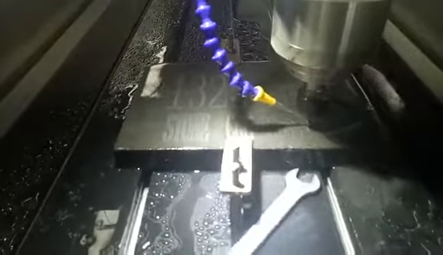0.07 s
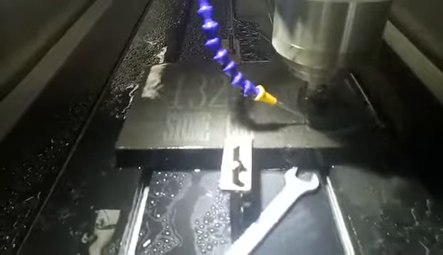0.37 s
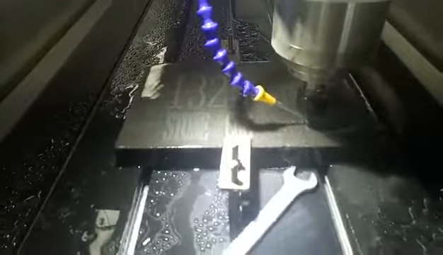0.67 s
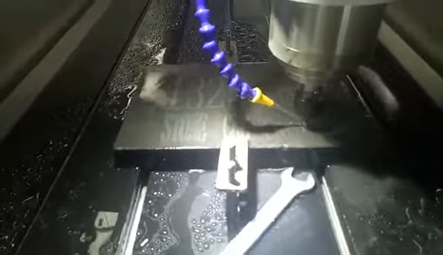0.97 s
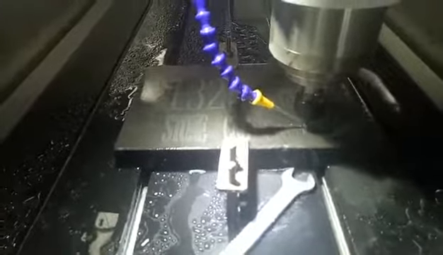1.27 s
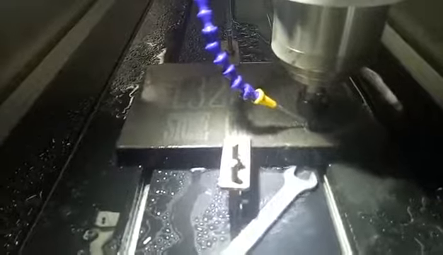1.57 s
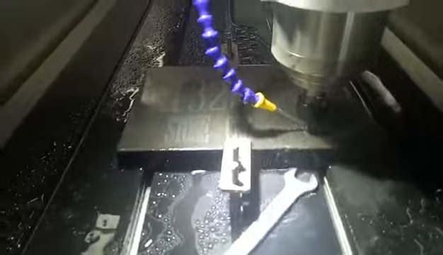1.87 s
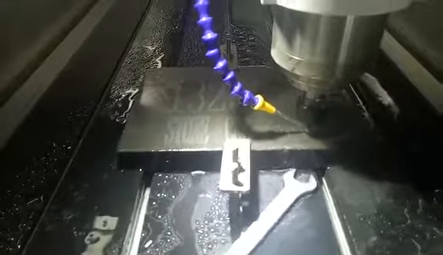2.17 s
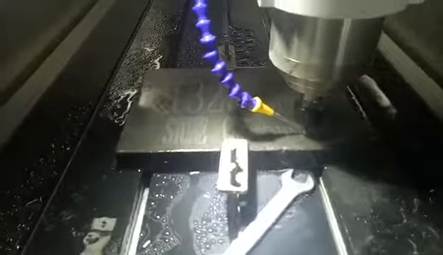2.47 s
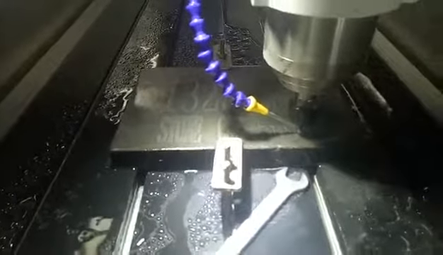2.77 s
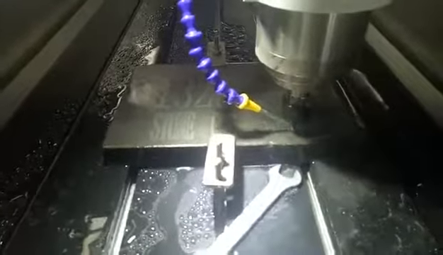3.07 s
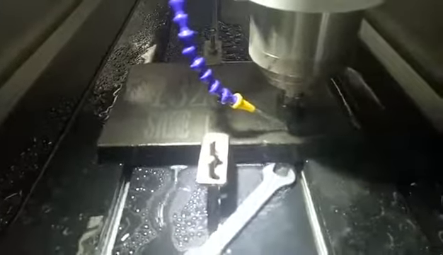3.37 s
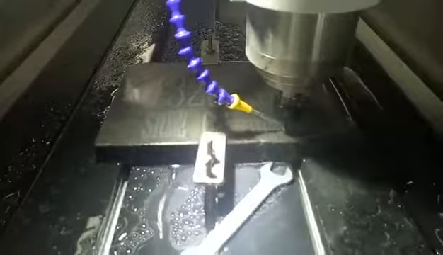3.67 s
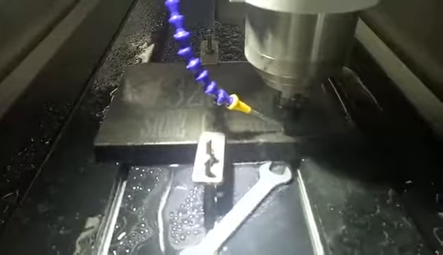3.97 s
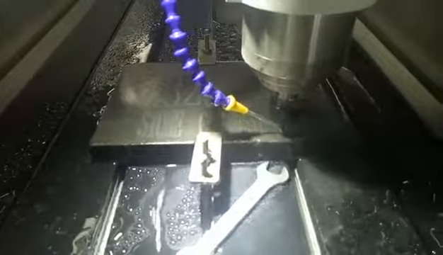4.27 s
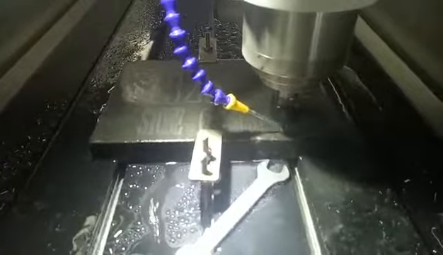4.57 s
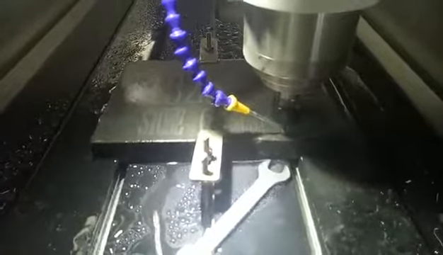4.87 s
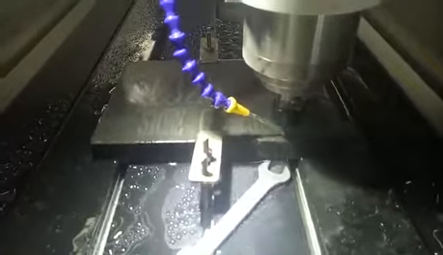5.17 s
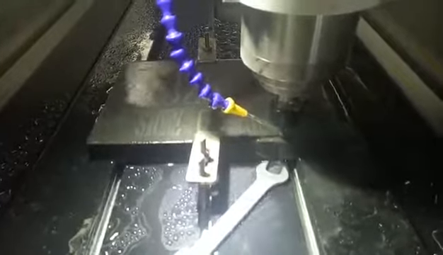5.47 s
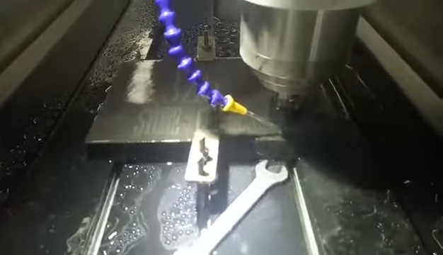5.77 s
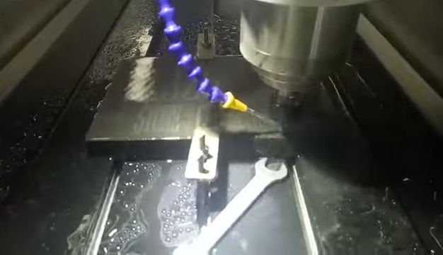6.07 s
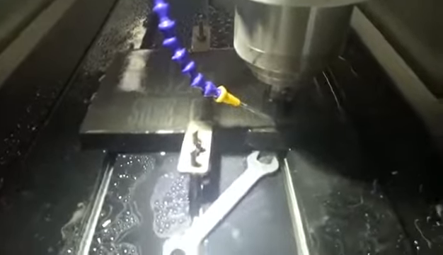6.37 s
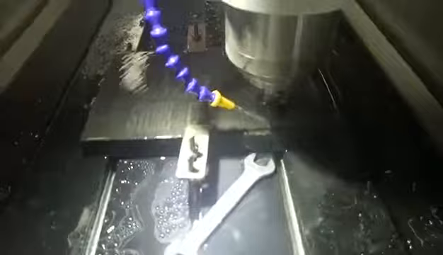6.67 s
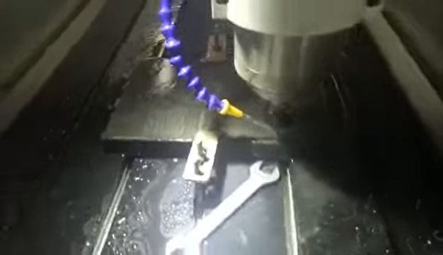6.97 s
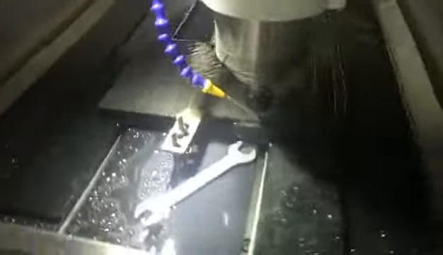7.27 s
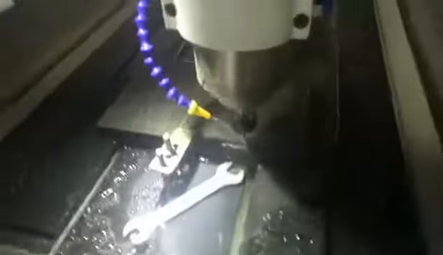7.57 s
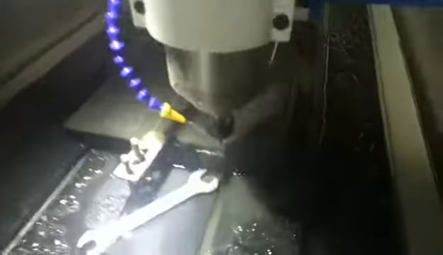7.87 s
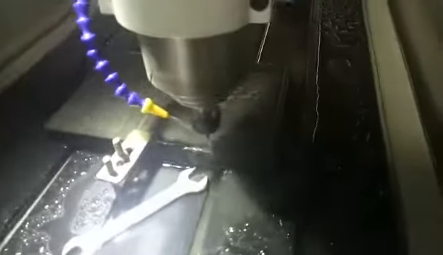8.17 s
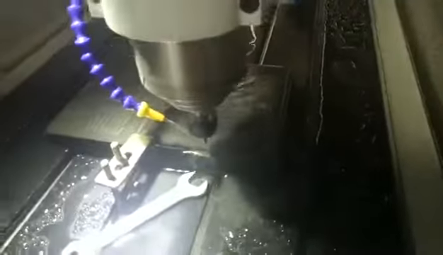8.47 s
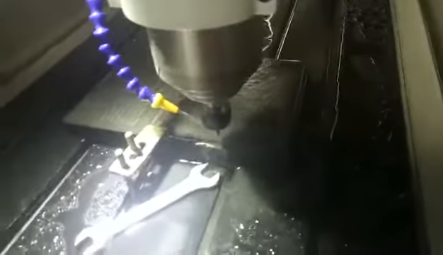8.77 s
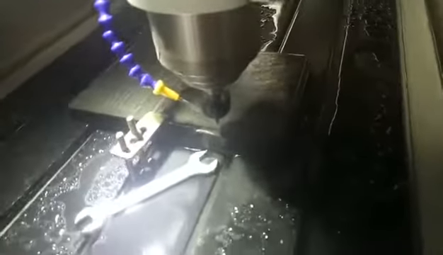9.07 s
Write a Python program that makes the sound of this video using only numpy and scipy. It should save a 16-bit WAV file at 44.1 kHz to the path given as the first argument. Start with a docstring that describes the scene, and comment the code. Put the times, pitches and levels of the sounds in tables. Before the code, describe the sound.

A fast milling bit engraves a wet stone slab inside a machine enclosure, making a loud, harsh, wavering whine with gritty grinding. A little past halfway the cutting stops abruptly as the bit lifts. The spindle keeps humming with thin, high whistles, while the moving table rumbles and its motors whine faintly. A coolant jet hisses throughout. The sound is close and leans to the left.

```python
"""A router bit at 24000 rpm engraves a wet stone slab inside a machine enclosure.
One impact a turn makes a harmonic series, a harsh, wavering whine, and crushes grit in noisy bursts.
After 5.5 s the bit lifts clear; the spindle's imbalance hums on and its motor drive whistles.
The coolant jet hisses throughout, and the axis drives rumble and whine faintly as the table travels."""
import sys
import numpy as np
from scipy import signal
from scipy.fft import rfft, irfft, next_fast_len
from scipy.io import wavfile
from scipy.ndimage import uniform_filter1d, map_coordinates

SR = 44100
rng = np.random.default_rng(int(sys.argv[2]) if len(sys.argv) > 2 else 0)


def store_pcm(level_fs):
    """Save levels as 16-bit WAV."""
    pcm = np.round(np.clip(level_fs, -1, 1) * 32767).astype(np.int16)
    wavfile.write(sys.argv[1], SR, np.atleast_2d(pcm).T)


N = 401751

SPINDLE_HZ = 400.3
# share of the bit's contact with the stone: time_s, contact_fraction
STONE_CONTACT = [(5.475, 1), (5.525, 0)]
# force on the bit as it enters the stone, settles to full depth and lifts: time_s, force_db
CUTTING_FORCE = [(0, -8.5), (.14, -9.5), (.22, -4), (.39, -3), (.55, -8), (.66, -1), (1.0, 1.5), (2.2, 0.5),
                 (3.0, 1), (3.6, -1), (4.25, 0), (4.8, -1), (5.44, 0.5), (5.52, -7.5)]
# the listener swings towards the spindle and away: time_s, gain_db
LISTENER_APPROACH = [(7, -1), (7.7, 3.5), (8.4, -0.5)]
# level difference between the ears: frequency_hz, left_minus_right_db
EAR_BALANCE = [(60, 6.5), (200, 5), (700, 6.5), (1280, 7), (2350, 11.5), (4330, 8.5), (6300, 8),
               (8000, 13.5), (11500, 1.5), (13500, -7)]


def whine(angle):
    """Periodic impacts make harmonics; uneven stone modulates the force and instant of each blow."""
    # side load on the bit, heard in the second order: time_s, level_db
    side_load = [(0.0, -30), (0.18, -30), (0.21, -24.5), (1.0, -25), (1.43, -29), (2.34, -26.5),
                 (5.34, -27), (5.45, -26)]
    # spectral envelope of orders 4, 5 and 8: frequency_hz, gain_db
    ring_spectrum = [(1600, -8.5), (2000, -9), (3200, -4.5)]
    # spectral envelope of orders 9 to 24: frequency_hz, gain_db
    screech_spectrum = [(3600, -5), (4000, -7.5), (4400, -7.5), (4800, -12.5), (5200, -15.5), (6400, -23.5),
                        (7600, -33.5), (8400, -43), (11000, -38.5), (15000, -51)]
    load_db, force_db = curves(side_load)[0], curves(CUTTING_FORCE)[0]
    strike = angle + 0.028 * wobble(25) + 0.0051 * wobble(140)
    load_gain = amp(load_db + 0.53 * wobble(12))
    out = load_gain * overtone(strike, order=2, rough=0.21, width_hz=17, lean_db=2, apart=0.38)
    bite_db = -28.5 + force_db + flare(3 * SPINDLE_HZ) + 0.92 * wobble(9)
    out += amp(bite_db) * overtone(strike, order=3, rough=0.32, width_hz=5.9, lean_db=9, apart=0.94)
    # the sixth and seventh orders lie on resonances of the tool
    low_db = -28.5 + force_db + chatter(6 * SPINDLE_HZ, collapse_db=11.5)
    high_db = -31 + force_db / 2 + chatter(7 * SPINDLE_HZ, collapse_db=9.5)
    out += amp(low_db) * overtone(strike, order=6, rough=0.14, width_hz=12, lean_db=9, apart=1.17)
    out += amp(high_db) * overtone(strike, order=7, rough=0.19, width_hz=9, lean_db=13.5, apart=0.65)
    for order in (4, 5, 8):
        hz = order * SPINDLE_HZ
        level_db = -29.5 + force_db + along(ring_spectrum, hz) + flare(hz) + 1.2 * wobble(13)
        tone = overtone(strike, order, rough=0.33, width_hz=7, lean_db=along(EAR_BALANCE, hz), apart=1.57)
        out += amp(level_db) * tone
    # the screech passes from one high order to another
    screech_db = -31 + 0.63 * force_db + 0.61 * wobble(10)
    for order in range(9, 25):
        hz = order * SPINDLE_HZ
        level_db = screech_db + along(screech_spectrum, hz) + flare(hz) + 2 * wobble(14)
        lean_db = along(EAR_BALANCE, hz)
        tone = overtone(strike, order, rough=0.63, width_hz=23, lean_db=lean_db, apart=1.55)
        out += amp(level_db) * tone
    return out * amp(0.5 * wobble(35) + 0.59 * wobble(200))


def overtone(strike, order, rough, width_hz, lean_db, apart):
    """Partial coherence: a steady harmonic plus narrowband noise; apart makes the two ears differ."""
    shared = np.exp(2j * np.pi * rng.random()) + rough * flutter(width_hz)
    per_ear = apart * rough * np.array([flutter(width_hz), flutter(width_hz)])
    left_lag = np.exp([[-1j * apart], [0j]])
    pair = np.real((shared + per_ear) * np.exp(1j * order * strike) * left_lag) * sides(lean_db)
    return pair / pair.mean(0).std()


def flare(hz):
    """Amplitude modulation, in dB: the hum or an overtone briefly swells or dips, its neighbours less."""
    # brief swells and dips of the hum and of single overtones: centre_s, length_s, frequency_hz, change_db
    flares = [(0.23, 0.32, 2800, 4.5), (0.388, 0.034, 1200, 2.5), (0.85, .55, 1420, 4),
              (1.184, 0.051, 2400, 2.5), (1.86, 0.15, 400, 4.5), (1.875, 0.099, 1200, 3),
              (1.87, .13, 2370, 7), (1.964, 0.12, 400, -5.5), (2.264, .11, 2820, 6),
              (2.25, 0.57, 1200, 2.5), (2.522, 0.055, 2750, 5), (2.68, 0.042, 2900, 0.5),
              (2.71, .1, 2430, 8), (2.795, 0.08, 2400, -24), (2.872, 0.066, 2800, 5.5),
              (3.0, 0.34, 1200, -2.5), (3.18, 0.085, 2400, 5), (3.715, 0.053, 2870, 4.5),
              (3.82, 0.27, 2420, 4.5), (3.88, 0.2, 400, 2), (4.15, 0.5, 3950, 7), (4.256, 0.12, 2400, 4),
              (4.265, 0.11, 400, 2), (4.28, 0.13, 4130, 6), (4.295, 0.19, 1190, 3.5),
              (4.68, 0.079, 2730, 5), (4.756, 0.059, 4000, 7.5), (4.807, 0.17, 400, 1.5),
              (4.942, 0.052, 2800, 9), (5.045, 0.082, 4000, 13), (5.056, 0.065, 2640, 6),
              (5.076, 0.24, 1200, -3), (5.463, 0.023, 400, -11), (5.498, 0.055, 400, 4.5),
              (5.67, 0.12, 400, -3)]
    return bells(flares, hz, width_hz=390, steepness=4)


def chatter(hz, collapse_db):
    """Self-excited vibration, in dB: it collapses at random and rebuilds, but holds during a flare."""
    flare_db = flare(hz)
    collapse = np.maximum(wobble(18), 0) ** 2 / 2
    return flare_db - collapse_db * collapse * np.exp(-np.abs(flare_db) / 2)


def grinding(angle):
    """Brittle fracture: each blow crushes a burst of grit, and the tool's modes ring with noise."""
    # spectrum of the crushed grit: frequency_hz, density_db
    grit_spectrum = [(40, -31), (80, -13.5), (130, -8.5), (300, -6.5), (550, 5), (700, -4), (950, -11.5),
                     (1300, 0.5), (1800, 0.5), (2600, 1.5), (4300, 1), (5500, -8), (7000, -22), (8500, -29),
                     (11000, -30.5), (13500, -24.5), (15000, -41.5)]
    # resonances of tool and collet: frequency_hz, width_hz, gain_db
    tool_modes = [(2444, 114, -5.5), (2795, 58, -4.5)]

    def tool_response(f):
        return sum(amp(db) * resonance(f, hz, width) ** 2 for hz, width, db in tool_modes)

    grind_db = -31 + 0.5 * curves(CUTTING_FORCE)[0]
    bursts = unit(np.exp(0.45 * np.cos(angle)) * amp(0.8 * wobble(60)))
    grit = enclosure_noise(lambda f: amp(along(grit_spectrum, f)), patchy_db=-0.65) * bursts
    ringing = enclosure_noise(tool_response, patchy_db=3.5)
    return amp(grind_db) * grit + amp(grind_db + 1) * ringing


def spindle(angle, contact):
    """Rotating imbalance forces a hum at the shaft frequency; the cut shakes it and widens the line."""
    # once-a-turn tone: time_s, level_db, left_minus_right_db
    imbalance_tone = [(0.0, -16.5, 8), (0.53, -11.5, 7), (0.83, -22.5, -9), (0.88, -37, -2),
                      (0.96, -22.5, -6), (1.47, -20, 0), (1.54, -23, -13), (1.77, -21.5, 0.5),
                      (2.23, -22, -13), (2.33, -30.5, 13), (2.43, -17.5, -5), (2.56, -19, -1),
                      (5.42, -17.5, -1.5), (5.47, -18.5, 8), (6.79, -16, 4.5), (7.65, -20.5, 2.5),
                      (8.34, -16.5, 4.5), (9.1, -18, 3.5)]
    # phase lag of the left ear in the enclosure's standing wave: time_s, lag_rad
    left_lag = [(.3, 0.3), (1.2, 0.64), (2, 0.3), (5.3, 0.22), (6, 0.15), (9, 0.21)]
    hum_db, lean_db = curves(imbalance_tone)
    waver_db = (0.37 + 0.45 * contact) * wobble(18)
    ear_phase = np.exp(1j * curves(left_lag)[0] * np.array([[-0.5], [0.5]]))
    hum = amp(hum_db + flare(SPINDLE_HZ) + waver_db) * sides(lean_db) * ear_phase
    shake = amp(-33.5) * flutter(width_hz=9) * sides(lean_db=5.5)
    shake += amp(-36) * np.array([flutter(width_hz=10), flutter(width_hz=17)])
    return np.sqrt(2) * np.real((hum + contact * shake) * np.exp(1j * angle))


def spindle_whistles(angle, contact):
    """Low shaft orders and high sidebands of the motor drive: thin tones that weaken under load."""
    # thin whistles of the free-running spindle: pitch_hz, level_db
    spindle_tones = [(600.5, -41.5), (800.6, -38), (1201, -46), (1601, -55), (2802, -49), (5798, -53),
                     (6199, -47), (6405, -50), (6599, -53), (6998, -59), (7400, -54.5), (7592, -62),
                     (8202, -64), (9994, -76), (11596, -76), (12796, -74), (13198, -76), (13410, -74),
                     (14000, -75), (14610, -71)]
    # low overtones ring on as the bit lifts; later, single high whistles swell or fade:
    # centre_s, length_s, frequency_hz, change_db
    swells = [(5.65, .3, 1601, 12.5), (5.65, 0.26, 1201, 8), (5.9, 0.45, 6405, 1.5), (6.2, 2, 8270, -11),
              (6.3, 1.1, 6199, -1), (7.27, .35, 7400, -10), (7.55, .45, 14610, -17), (7.7, 0.18, 6405, 5),
              (7.7, 0.99, 6250, -11), (8.45, .8, 14610, 4), (8.9, 0.4, 6199, 4), (8.9, .5, 7400, 6)]
    out = np.zeros((2, N))
    for hz, db in spindle_tones:
        level_db = db + bells(swells, hz, width_hz=100, steepness=2) + wobble(1.8)
        tone = amp(level_db) * np.sin(hz / SPINDLE_HZ * angle + 2 * np.pi * rng.random())
        out += tone * sides(along(EAR_BALANCE, hz))
    return np.sqrt(2) * amp(curves(LISTENER_APPROACH)[0] - 9.5 * contact) * out


def motor_drive(angle):
    """Magnetic forces make the windings whistle at the switching rate, beating with the sixth order."""
    # whistle of the drive: time_s, switching_tone_db, octave_db
    whistle_levels = [(0, -60.5, -58.5), (5.5, -59, -51), (5.62, -36.5, -58), (6.3, -40, -52),
                      (7.3, -41.5, -44.5), (7.6, -40, -40.5), (7.9, -45, -40), (9.11, -45.5, -40)]
    switching_hz = 2498.5
    switch_db, octave_db = curves(whistle_levels)
    phase = 2 * np.pi * switching_hz * np.arange(N) / SR
    beat = amp(switch_db + wobble(8.8)) * (np.sin(phase) + amp(3) * np.sin(6 * angle))
    octave = amp(octave_db + 1.6 * wobble(6.6)) * np.sin(2 * phase)
    return np.sqrt(2) * (beat + octave) * sides(along(EAR_BALANCE, switching_hz))


def coolant():
    """A turbulent jet hisses on slab and bit, louder when the bit is clear and the listener near."""
    # spectrum of the spray: frequency_hz, density_db
    spray_spectrum = [(50, -37), (300, -20.5), (900, -7.5), (1700, -6.5), (2300, -2.5), (3000, -2.5),
                      (3500, -6), (4250, -0.5), (5000, -8), (5800, -15), (6700, -17), (7600, -28),
                      (8800, -34.5), (11000, -38.5), (14500, -57)]
    spray_db = -31 - 3 * curves(STONE_CONTACT)[0] + 0.61 * curves(LISTENER_APPROACH)[0]
    gain = amp(spray_db + 0.33 * wobble(9))
    return gain * enclosure_noise(lambda f: amp(along(spray_spectrum, f)), patchy_db=1.36)


def axes():
    """Forced vibration: screws and slides rumble during each move and excite two low frame modes."""
    # moves of the table, each lasting until the next: start_s, rumble_db, low_mode_db, high_mode_db
    moves = [(0, -41, -49, -50), (5.54, -31, -43, -36.5), (6.3, -31, -40.5, -35), (7.1, -29.5, -40, -32.5),
             (8.238, -32, -37, -45), (8.68, -30.5, -43, -35)]
    # spectrum of screws and slides: frequency_hz, density_db
    rumble_spectrum = [(25, -2.5), (55, -14.5), (80, -4), (130, 0), (180, 4), (220, 0.5), (330, -2.5),
                       (580, -1), (750, -8), (1300, -10), (2500, -43.5)]
    # modes of the frame: frequency_hz, width_hz
    frame_modes = [(90, 4), (160.5, 1.3)]
    ramp_s = 0.18  # time an axis takes to reach its speed
    t = np.arange(N) / SR
    starts, *levels_db = np.transpose(moves)
    stepped_db = np.array(levels_db)[:, np.searchsorted(starts[1:], t)]
    rumble_db, *modes_db = uniform_filter1d(stepped_db, size=int(ramp_s * SR), axis=1)
    out = amp(rumble_db) * enclosure_noise(lambda f: amp(along(rumble_spectrum, f)), patchy_db=1.5)
    for db, (hz, width) in zip(modes_db, frame_modes):
        drone = unit(np.real((1 + 0.44 * flutter(width)) * np.exp(2j * np.pi * hz * t)))
        out += amp(db) * drone * sides(lean_db=5.5)
    return out


def servos():
    """Steady rotation gives a steady pitch: each axis motor sings faintly while it holds a speed."""
    # whines of the axis motors: start_s, end_s, pitch_hz, level_db
    motor_whines = [(0, 5.45, 468, -45), (6.9, 8.4, 2742, -46), (7.08, 7.38, 760, -40),
                    (7.35, 7.72, 1920, -45), (7.9, 8.15, 1802, -46), (8.05, 9.11, 2277, -46),
                    (8.15, 8.62, 1249, -45), (8.22, 8.55, 915, -44)]
    fade_s = 0.035
    t = np.arange(N) / SR
    out = np.zeros(N)
    for start, end, hz, db in motor_whines:
        gate = np.clip(np.minimum(t - start, end - t) / fade_s, 0, 1)
        tone = np.real((1 + 0.5 * flutter(width_hz=6.5)) * np.exp(2j * np.pi * hz * t))
        out += amp(db) * gate * tone
    return out * sides(lean_db=8)


def enclosure_noise(colour, patchy_db):
    """Diffuse field: patchy noise, alike at both ears only at low frequencies; their mean has rms 1."""
    # likeness of the two ears: frequency_hz, correlation
    coherence = [(60, 0.99), (300, 0.94), (630, 0.77), (1400, 0), (3000, 0), (7000, 0)]

    def mid_side_gains(f):
        turn = np.arccos(np.clip(along(coherence, f), -1, 1)) / 2
        return np.array([np.cos(turn), np.sin(turn)])

    spectrogram = signal.stft(rng.standard_normal((2, N)), nperseg=512)[2]
    patches = uniform_filter1d(rng.standard_normal(spectrogram.shape[1:]), size=6, axis=0)
    patches = uniform_filter1d(patches, size=12, axis=1)
    pair = signal.istft(spectrogram * amp(patchy_db * unit(patches)), nperseg=512)[1][:, :N]
    mid, side = filtered(pair, mid_side_gains)
    ears = np.array([mid + side, mid - side])
    out = filtered(ears, lambda f: colour(f) * sides(along(EAR_BALANCE, f)))
    return out / out.mean(0).std()


def bells(events, hz, width_hz, steepness):
    """Bell-shaped envelopes: the change in dB that events within about width_hz give the tone at hz."""
    t = np.arange(N) / SR
    change_db = np.zeros(N)
    for centre_s, length_s, centre_hz, db in events:
        nearness = np.exp(-((hz - centre_hz) / width_hz) ** 2)
        if nearness > 0.01:
            during = slice(*np.searchsorted(t, [centre_s - 2 * length_s, centre_s + 2 * length_s]))
            bell = np.exp(-np.abs(2 * (t[during] - centre_s) / length_s) ** steepness)
            change_db[during] += db * nearness * bell
    return change_db


def wobble(rate):
    """Slow modulation: a spline through random knots, rate of them a second."""
    knots = rng.standard_normal(int(N * rate / SR) + 4)
    coarse = np.arange(0, N + 32, 32)
    return np.interp(np.arange(N), coarse, map_coordinates(knots, [coarse * rate / SR]))


def flutter(width_hz):
    """Line broadening: random amplitude and phase that give a tone skirts of this width."""
    coarse = np.arange(0, N + 64, 64)
    hz = np.fft.fftfreq(len(coarse), 64 / SR)
    noise = rng.standard_normal(len(hz)) + 1j * rng.standard_normal(len(hz))
    narrowband = np.fft.ifft(np.fft.fft(noise) / (1 + 1j * hz / width_hz))
    return np.interp(np.arange(N), coarse, unit(narrowband))


def resonance(f, hz, width):
    """Frequency response of a damped oscillator."""
    return 1j * f * width / (hz * hz - f * f + 1j * f * width)


def filtered(x, response):
    """Linear filtering: the spectrum of x times a response of frequency."""
    size = next_fast_len(N + 8192)
    return irfft(rfft(x, size) * response(np.fft.rfftfreq(size, 1 / SR)), size)[..., :N]


def sides(lean_db):
    """Interaural level difference as left and right gains with mean 1."""
    half_db = np.atleast_1d(lean_db) / 2
    gains = np.array([amp(half_db), amp(-half_db)])
    return gains / gains.mean(0)


def along(points, hz):
    """Interpolate (frequency_hz, value) points on a log frequency axis."""
    frequencies, values = np.transpose(points)
    return np.interp(np.log(hz + 1), np.log(frequencies + 1), values)


def curves(rows):
    """Interpolate each column after the time to one value per sample."""
    times, *columns = np.transpose(rows)
    return [np.interp(np.arange(N) / SR, times, column) for column in columns]


def amp(db):
    """Decibels to gain."""
    return 10 ** (np.asarray(db) / 20)


def unit(x):
    """Scale to rms 1."""
    return x / np.sqrt(np.mean(np.abs(x) ** 2) + 1e-20)


def scene():
    """Superposition of all sources; one shaft angle keeps hum, whine and grit in step."""
    angle = 2 * np.pi * np.cumsum(SPINDLE_HZ + 0.073 * wobble(3.013)) / SR
    contact = np.clip(curves(STONE_CONTACT)[0], 0, 1)
    motor = spindle(angle, contact) + spindle_whistles(angle, contact) + motor_drive(angle)
    cut = contact * (whine(angle) + grinding(angle))
    return motor + cut + coolant() + axes() + servos()


def record(dry):
    """Band limiting: a second-order high-pass thins the deep bass and a sharp cutoff ends the treble."""
    bass_hz, top_hz = 48, 15150
    return filtered(dry, lambda f: f ** 2 / np.hypot(f ** 2, bass_hz ** 2) * (f < top_hz))


dry = scene()
out = record(dry)
store_pcm(out)
```